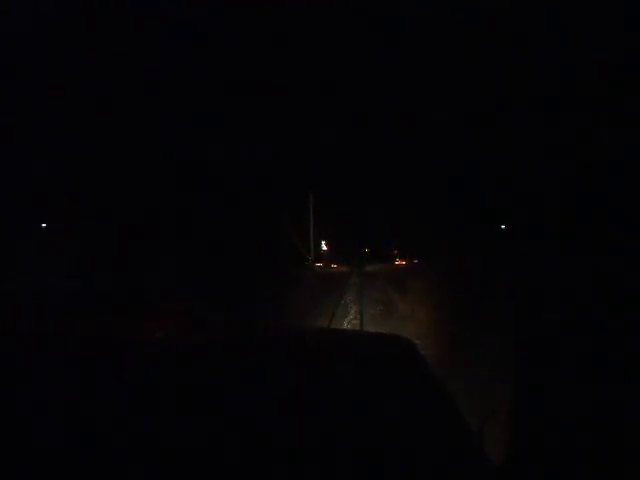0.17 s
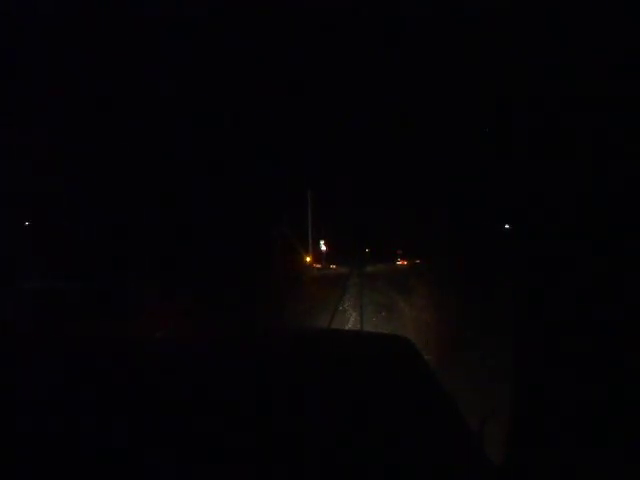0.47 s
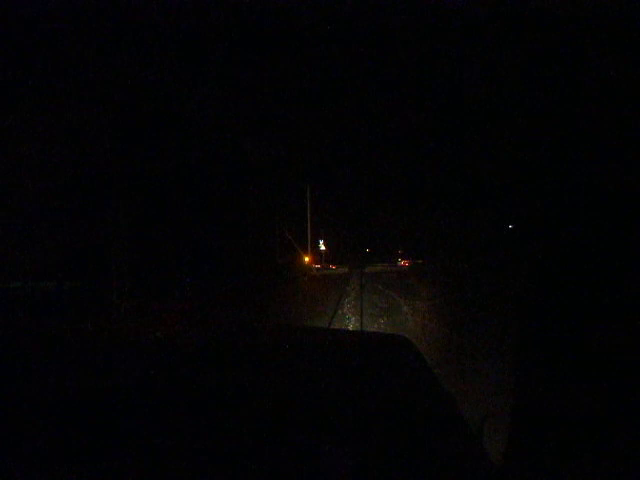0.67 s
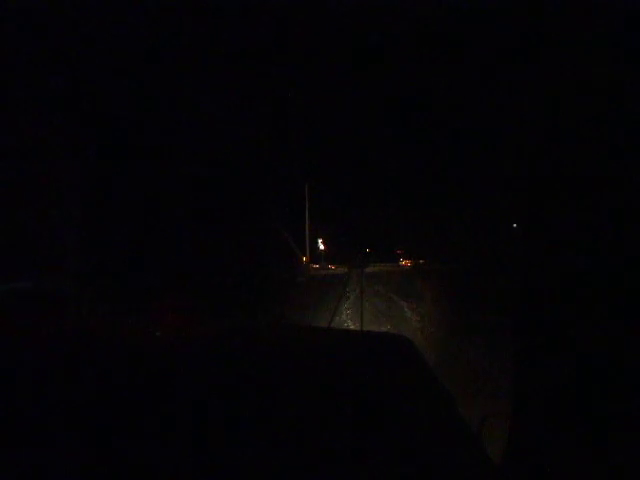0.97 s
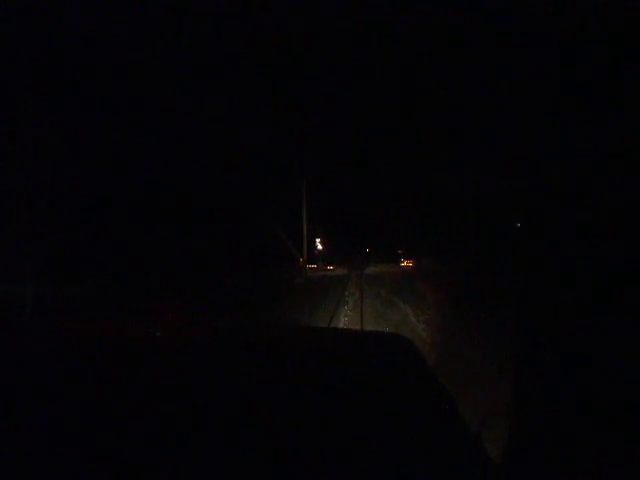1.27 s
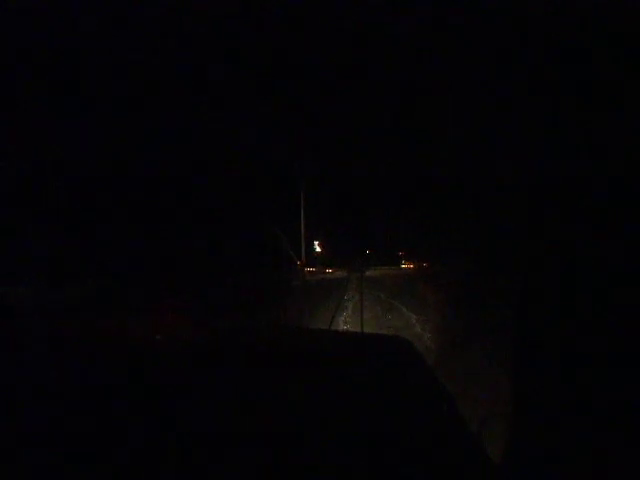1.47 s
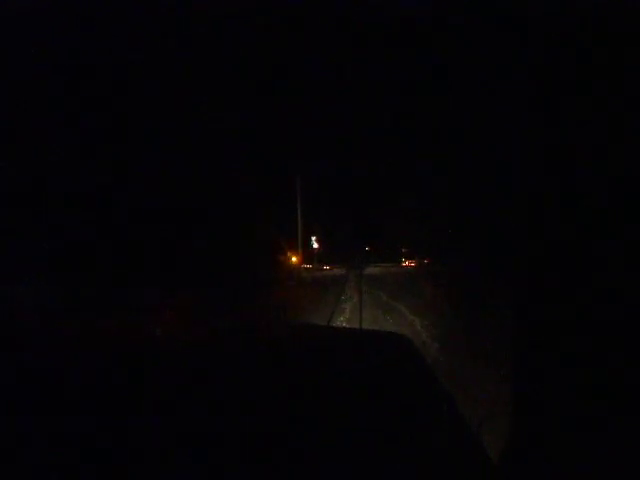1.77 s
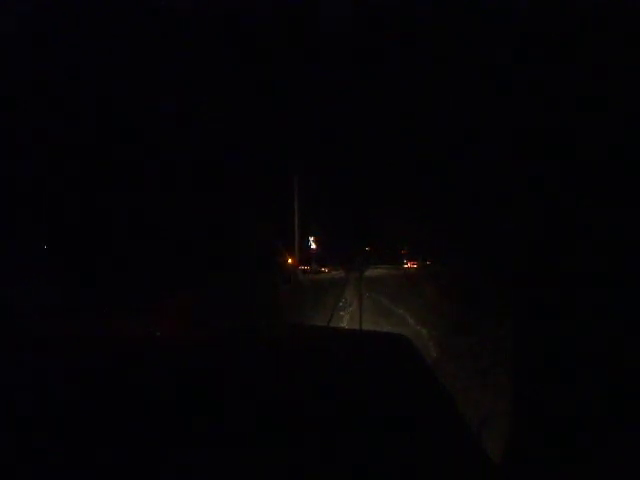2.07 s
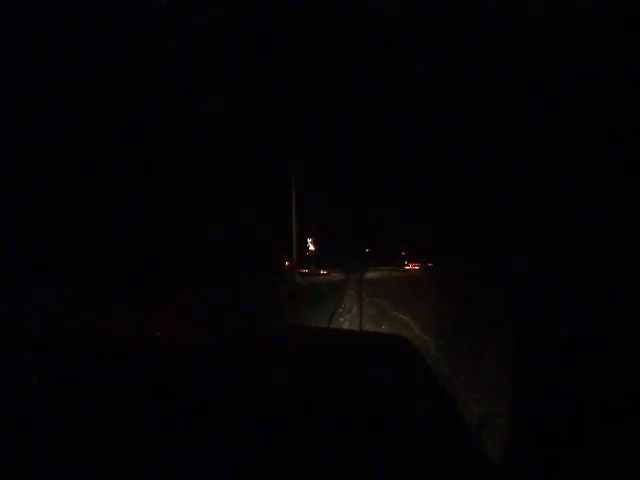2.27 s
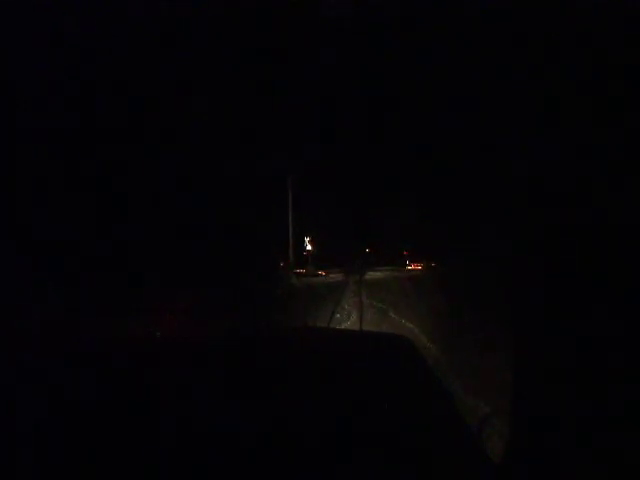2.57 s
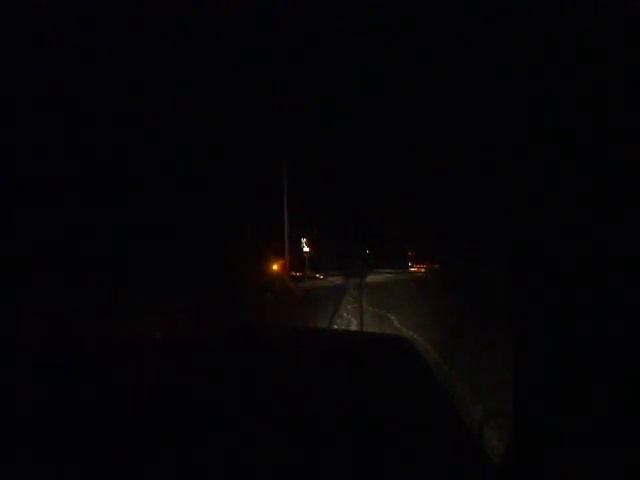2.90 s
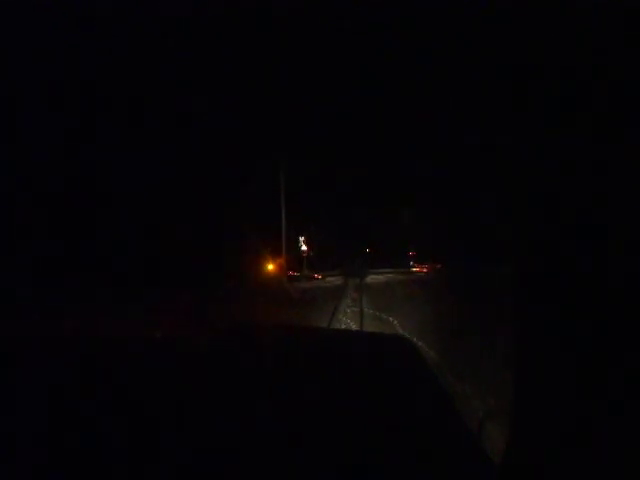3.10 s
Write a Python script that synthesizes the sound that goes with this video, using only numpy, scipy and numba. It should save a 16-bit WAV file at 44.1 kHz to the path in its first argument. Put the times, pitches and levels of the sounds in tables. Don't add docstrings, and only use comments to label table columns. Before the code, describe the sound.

Close, rough outdoor pickup of a diesel locomotive at steady throttle, low pulsing throb, whine and rattling panels; a loud three-note horn is cut off early, and blares briefly again near the end, dipping the engine level.

```python
import sys
import numpy as np
from scipy import signal
from scipy.fft import rfft, irfft
from scipy.io import wavfile
from scipy.ndimage import uniform_filter1d
from numba import njit

SR = 44100
rng = np.random.default_rng(int(sys.argv[2]) if len(sys.argv) > 2 else 0)


def master_out(mix):
    frames = np.transpose(np.atleast_2d(mix))
    ceiling = np.clip(frames, -1, 1)
    pcm = np.round(ceiling * 32767).astype(np.int16)
    wavfile.write(sys.argv[1], SR, pcm)


def boost(x):
    u = np.asarray(x, float) / 20
    return 10 ** u


N = 142884

SHAFT_HZ = 11.0076


def level(x, db):
    return x * boost(db) / np.sqrt(np.mean(x ** 2))


def walk(rate):
    hold = int(SR / rate)
    steps = np.repeat(rng.standard_normal(N // hold + 1), hold)
    return 1.24 * uniform_filter1d(uniform_filter1d(steps, hold), hold)[:N]


def ring(x, hz, width_hz):
    return signal.lfilter(*signal.iirpeak(hz, hz / width_hz, fs=SR), x)


def double_ring(x, hz, width_hz):
    return ring(ring(x, hz, width_hz), hz, width_hz)


def hum(hz, width_hz, db):
    return level(double_ring(rng.standard_normal(N), hz, 1.3 * width_hz), db)


def shaft_tones(orders, levels_db, wander_db, wander_rad, rate):
    turn = 2 * np.pi * SHAFT_HZ * np.arange(N) / SR
    out = np.zeros(N)
    for order, db in zip(orders, levels_db):
        strength = np.sqrt(2) * boost(db + wander_db * walk(rate))
        start_phase = 2 * np.pi * rng.random()
        out += strength * np.sin(order * turn + start_phase + wander_rad * walk(rate))
    return out


# (time [s], exhaust level [dB],
# generator and fan side level [dB], floor-plate drumming level [dB])
LOAD = [(0, 1., 1., -5.), (.3, 1., 1., -3.5), (.55, 0.5, -1, -1.5), (.75, -2.5, 2.5, -4),
        (.95, -0.5, 0.5, -3.5), (1.15, 0.5, 1, 1), (1.4, 0, 2., -7), (1.6, 1, 0, -2), (1.82, .5, -0.5, 3.5),
        (2.0, 1, 0.5, -5.5), (2.2, .5, 0, 5), (2.42, -1.5, 0.5, 4.5), (2.62, -7, 1, -3),
        (2.8, 1.5, 1.5, -4.5), (2.95, -1, 4, -4.), (3.1, 1.5, 1, 6.5), (3.24, -2, -0.5, -6)]


def load(t):
    time, *levels_db = np.array(LOAD).T
    return [np.interp(t, time, db) for db in levels_db]


# (frequency [Hz], level [dB per Hz])
ROAR_COLOUR = [(22, -11), (60, -2), (170, -15), (600, -20.5), (1300, -25.5), (2100, -28.5), (7000, -28.5),
               (9000, -29.5)]


def roar():
    hz = np.arange(N // 2 + 1) * SR / N + 1e-3
    swell = walk(6)
    colour_hz, colour_db = np.array(ROAR_COLOUR).T
    noise = rfft(rng.standard_normal(N)) * boost(np.interp(np.log(hz), np.log(colour_hz), colour_db))
    out = np.zeros(N)
    for octave in np.arange(3, 14.5, .5):
        share = np.clip(1 - 2 * abs(np.log2(hz) - octave), 0, 1)
        flicker_db = 1.3 * walk(15) + 0.77 * swell
        out += irfft(noise * share, N) * boost(flicker_db)
    return level(out, -26.5)


# (frequency [Hz], width [Hz], rms level [dB])
PANELS = [(32, 6.7, -35.5), (57.4, 16, -33), (86.4, 9, -34), (136.9, 16, -37.5), (201.8, 30, -40.5),
          (265, 60, -44.5), (392, 33, -43), (900, 110, -44.5), (3140, 300, -42.5), (4326, 39, -49),
          (4385, 30, -46), (4495, 45, -49), (4594, 66, -44), (4766, 80, -45), (5350, 200, -46.5),
          (6320, 340, -48), (7440, 210, -56.5)]


def panels():
    return sum(hum(hz, width_hz, db) * boost(1.5 * walk(4.94)) for hz, width_hz, db in PANELS)


def rattle():
    ticks_per_s, spread_db, ring_hz, width_hz = 900, 3.2, 6900, 3300
    chance, force = rng.random((N, 2)).T
    ticks = (chance < ticks_per_s / SR) * boost(-spread_db * np.log(force + 1e-9))
    return level(double_ring(ticks, ring_hz, width_hz), -46)


def floor_plate(t, drum_db):
    strength = boost(-35 + drum_db + 1.7 * walk(18))
    return strength * np.sin(2 * np.pi * 212 * t + .9 * walk(14))


WHINE_ORDERS = [78.83, 83.8, 109.15, 112.76, 144, 180, 198, 216, 234, 252, 277, 279, 282, 288, 291, 299,
                300, 378, 432, 440, 441, 576, 720]
WHINE_DB = [-49, -55, -50, -54.5, -45, -57.5, -69.5, -52, -50.5, -48, -56.5, -67, -60, -40, -58.5, -56,
            -55.5, -53.5, -52, -56, -54, -45.5, -57.5]


def whine():
    return shaft_tones(WHINE_ORDERS, WHINE_DB, wander_db=1.96, wander_rad=0.33, rate=12.)


THUD_ORDERS = [1.5, 2, 3, 4, 4.65, 5, 5.5, 6, 7.37, 8, 9, 10, 11, 12, 12.5, 14, 24, 26, 29.92, 34.75, 36]
THUD_DB = [-47.5, -50.5, -53.5, -28, -44, -40, -40.5, -41, -30.5, -21, -29, -39, -47, -39, -42, -52, -44.5,
           -45.5, -36.5, -51.5, -47.5]


def thud():
    return shaft_tones(THUD_ORDERS, THUD_DB, wander_db=0.82, wander_rad=0.3, rate=4.)


def horn_air(t, start, shut):
    flow = np.clip((t - start) / .03, 0, 1) * np.exp(-np.clip(shut, 0, 9) / .04)
    hiss = level(ring(rng.standard_normal(N), 4200, 3500), -39.5)
    valve = hum(5950, 250, -41.5) * boost(2.5 * walk(15))
    return flow * (hiss + valve)


def squeak(t):
    since = t - 2.495
    swell = np.exp(-.5 * (since / 0.012) ** 2)
    return np.sqrt(2) * boost(-32) * swell * np.sin(2 * np.pi * 1174 * t - 300 * since ** 2)


def field(x):
    t60_s, late_s, top_hz = 1.1, .05, 900
    age = np.arange(SR) / SR
    tail = rng.standard_normal(SR) * boost(-60 * age / t60_s) * np.clip(age / late_s, 0, 1) ** 2
    tail = signal.lfilter(*signal.butter(1, top_hz, fs=SR), tail)
    tail *= boost(-14) / np.sqrt(np.sum(tail ** 2) * SR / 4 / top_hz)
    return signal.fftconvolve(x, tail)[:N]


def bell(t, start, shut, sharp, voice, harmonics, levels_db, fades):
    hz, late, swell, stops, over = voice
    age = np.clip(t - start - late, 0, 9)
    accent = boost(2.5 * np.exp(-age / .04))
    on = np.clip(age / swell, 0, 1) * np.clip((stops - shut) / .05, 0, 1) * accent
    pitch = hz * (1 + sharp + over * np.exp(-age / .03) - 0.0087 * np.clip(shut, 0, .3))
    phase = 2 * np.pi * (np.cumsum(pitch) / SR + rng.random())
    early_s = .04
    out = np.zeros(N)
    for i, (k, db) in enumerate(zip(harmonics, levels_db)):
        fade = fades[min(i, len(fades) - 1)]
        sag = boost(-10 * (np.clip(shut + early_s, 0, 1) / (fade + early_s)) ** 2)
        if k == 1:
            sag = np.maximum(sag, boost(-11))
        dull = min(k - 1, 2) * .5
        brighten = np.clip(age / (swell + 0.017 * dull), 0, 1) ** (2 * dull)
        strength = boost(db + 0.4 * np.sqrt(k) * walk(25))
        out += np.sqrt(2) * on * sag * brighten * strength * np.sin(k * phase + k * k)
    return out


# (opens [s], held [s], sharp by [share])
BLASTS = [
    (-.1, .295, -.0017),
    (2.445, .245, .0015),
]
# (pitch [Hz], speaks after [s], swell [s], stops after valve shuts [s], onset sharpness [share])
BELLS = [
    (305.0, 0., .022, .17, .004),
    (369.4, .035, .05, .135, .01),
    (485.1, .043, .02, .22, .003),
]
BELL_HARMONICS = [
    [1, 2, 3, 4, 5, 8, 10, 12, 20],
    [1, 2, 3, 4, 7, 11, 13, 14, 16],
    [1, 2, 3, 4, 6, 8, 9, 11, 12, 13],
]
# (first blast rms level [dB], second blast rms level [dB])
BELL_DB = [
    [(-20, -20), (-38, -36), (-42, -35), (-41, -42), (-45, -46), (-57, -48), (-38, -46), (-53, -53),
     (-52, -52)],
    [(-23.5, -22.5), (-35, -34), (-42, -39), (-58, -55), (-54, -57), (-51, -56), (-52, -53), (-48, -48),
     (-52, -52)],
    [(-23.5, -23.5), (-32, -31), (-37, -38), (-57, -52), (-55, -47), (-49, -43), (-53, -44), (-49, -48),
     (-48, -47), (-58, -50)],
]
BELL_FADE_S = [
    [.15, .08, .03, .01, .03, .03, .02],
    [.095, .03, .03, .03, .03, .02, .02],
    [.05, .01, .06, .03, .02, .03, .02],
]


def horn(t):
    out = squeak(t)
    for blast, (start, held, sharp) in enumerate(BLASTS):
        shut = t - start - held
        for voice, harmonics, rows, fades in zip(BELLS, BELL_HARMONICS, BELL_DB, BELL_FADE_S):
            levels_db = [row[blast] for row in rows]
            out += bell(t, start, shut, sharp, voice, harmonics, levels_db, fades)
        out += horn_air(t, start, shut)
    return out + field(out)


def scene():
    t = np.arange(N) / SR
    exhaust_db, side_db, drum_db = load(t)
    out = (roar() + panels() + rattle()) * boost(0.41 * side_db)
    out += floor_plate(t, drum_db)
    out += whine() * boost(side_db)
    out += thud() * boost(exhaust_db)
    return (out + horn(t))[None]


@njit
def follow(power, up, down, e):
    out = np.empty(len(power))
    for i in range(len(power)):
        e += (power[i] - e) * (up if power[i] > e else down)
        out[i] = e
    return out


def gain_control(dry):
    attack_s, release_s, top_db, start_db = 0.12, 0.17, -22, -16.5
    heard = signal.sosfilt(signal.butter(2, 200, "high", fs=SR, output="sos"), dry[0])
    power = uniform_filter1d(heard ** 2, size=800)
    e = follow(power, 1 / (attack_s * SR), 1 / (release_s * SR), 1. * boost(start_db) ** 2)
    return dry * np.minimum(boost(top_db) / np.sqrt(e), 1) ** 0.51


def resample(x):
    rate_hz, pad = 16000, 4410
    roll_hz, roll_db, roll_power = 7325, -37.5, 2.34
    fade = np.hanning(2 * pad)
    before = x[pad:0:-1] * fade[:pad]
    after = x[-2:-pad - 2:-1] * fade[pad:]
    x = np.concatenate([before, x, after])
    spec = rfft(x)
    hz = np.arange(len(x) // 2 + 1) * SR / len(x)
    half = round(rate_hz * len(x) / SR) // 2
    spec[half:2 * half] = np.conj(spec[half:0:-1])
    over = np.clip((hz - roll_hz) / (9000 - roll_hz), 0, 2)
    return irfft(spec * boost(roll_db * over ** roll_power), len(x))[pad:-pad]


def top_cut(x):
    return signal.sosfilt(signal.butter(12, 9080, fs=SR, output="sos"), x)


def record(dry):
    x = np.tanh(1.371 * gain_control(dry)) / 1.42
    fade_in = np.clip(np.arange(N) / 60, 0, 1)
    x = resample(x[0])[None] * fade_in - .0026
    return top_cut(x)


dry = scene()
out = record(dry)
master_out(out)
```